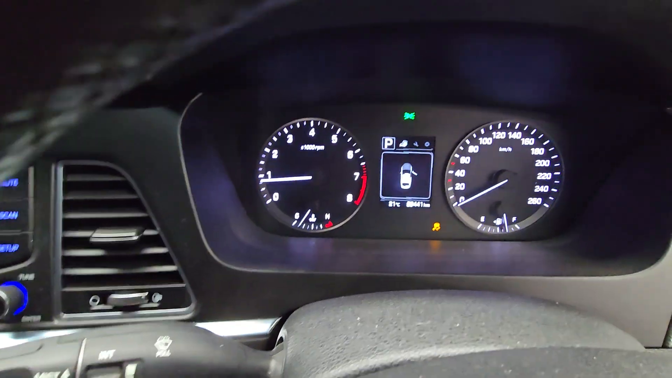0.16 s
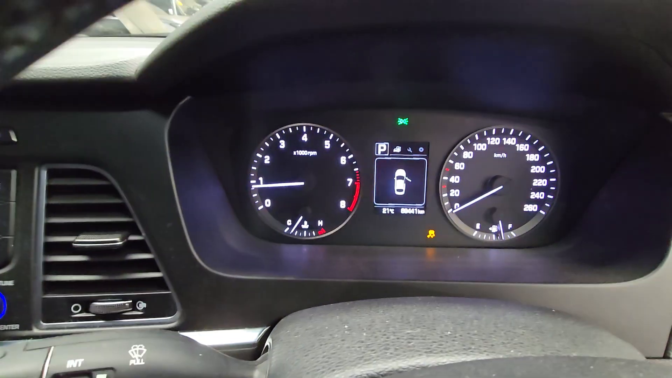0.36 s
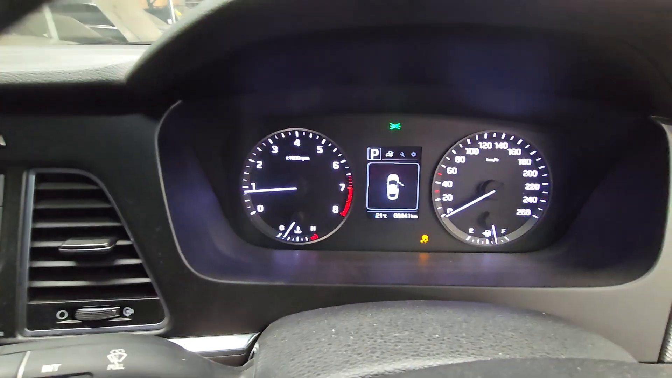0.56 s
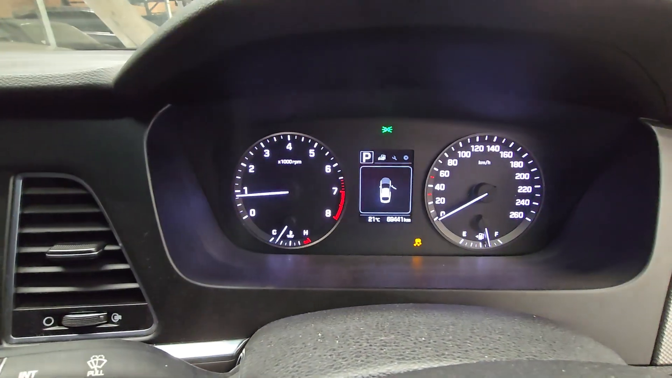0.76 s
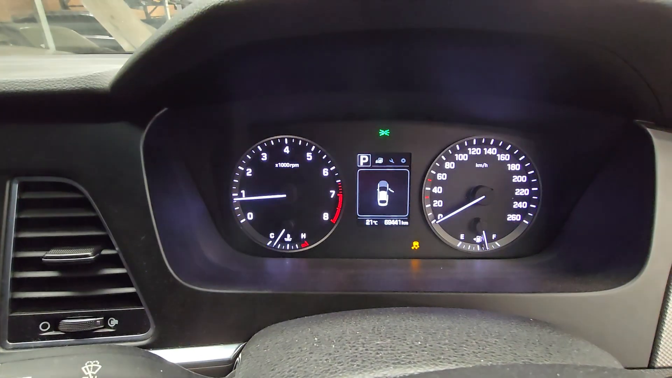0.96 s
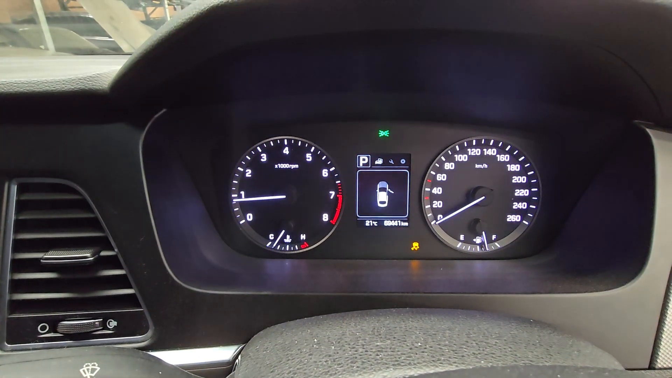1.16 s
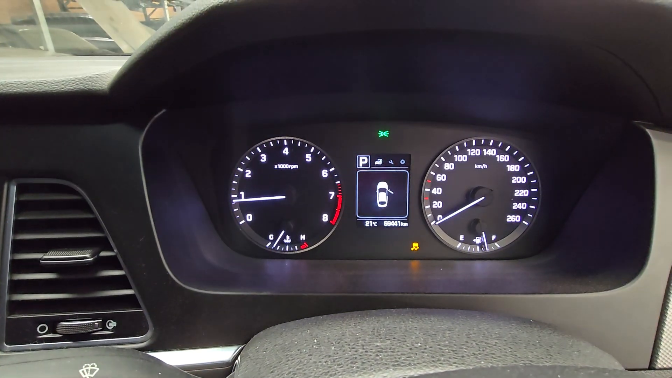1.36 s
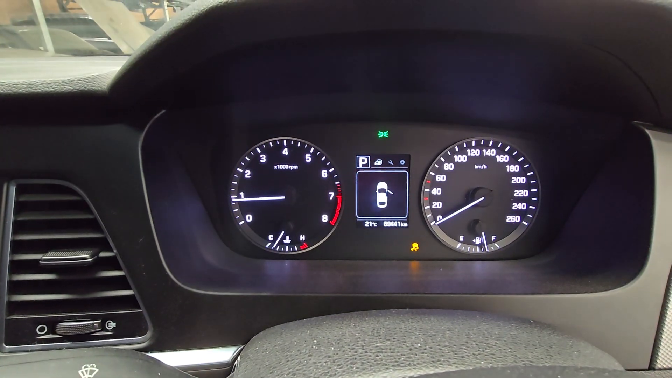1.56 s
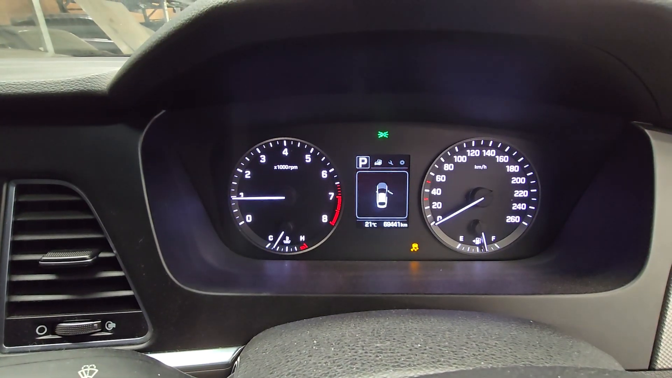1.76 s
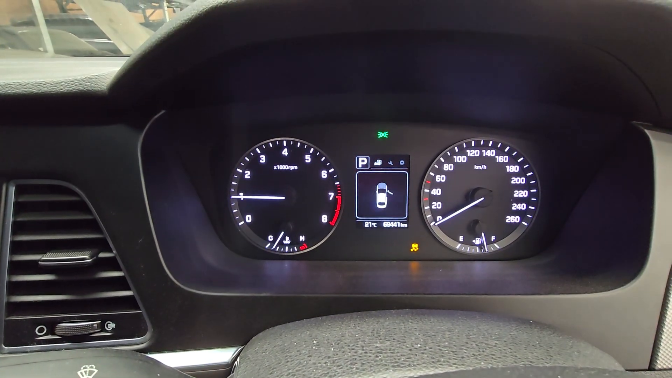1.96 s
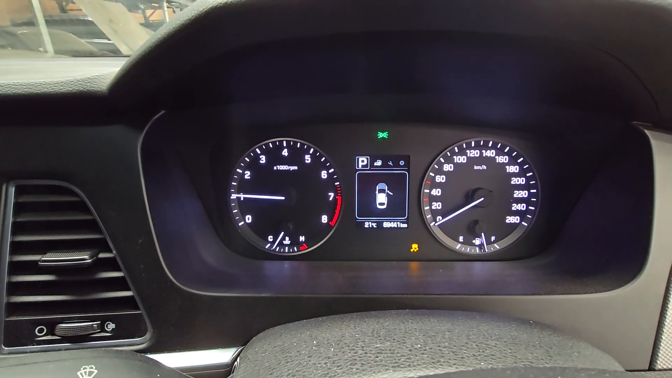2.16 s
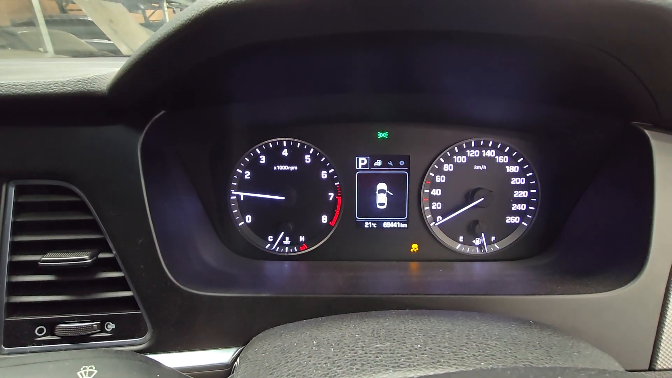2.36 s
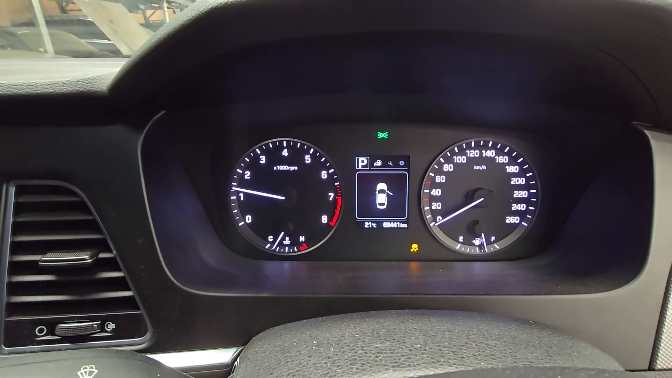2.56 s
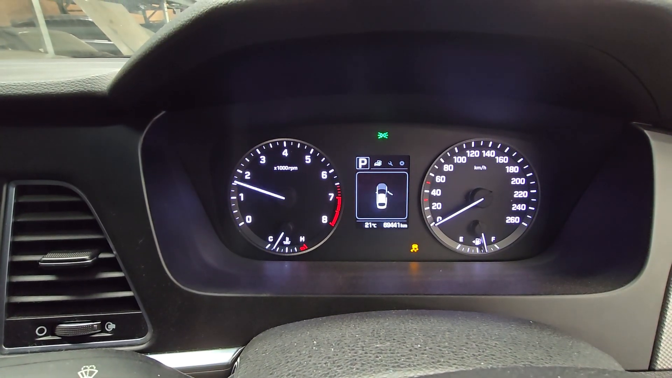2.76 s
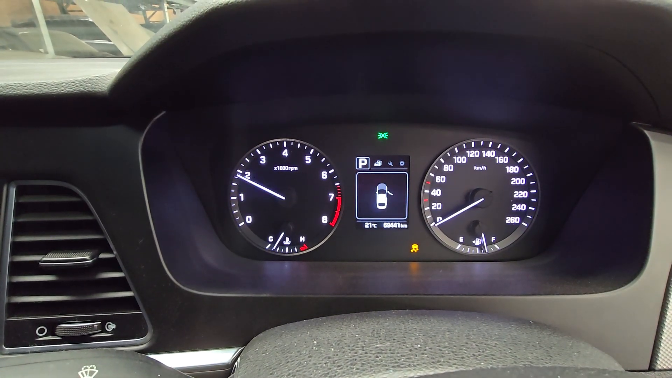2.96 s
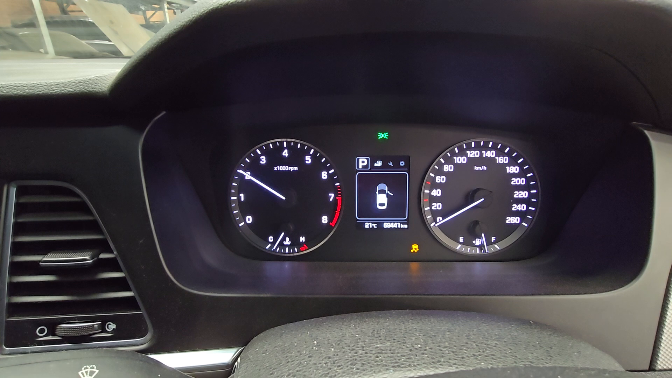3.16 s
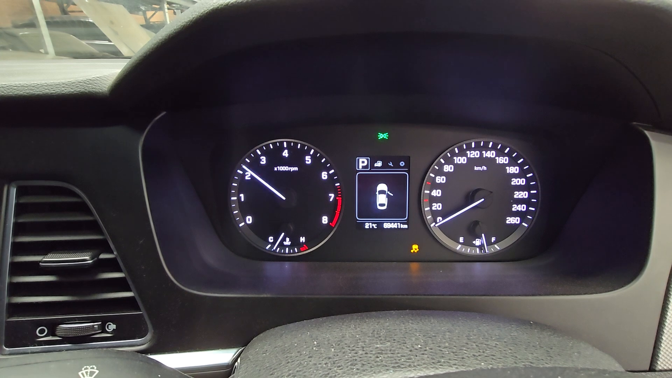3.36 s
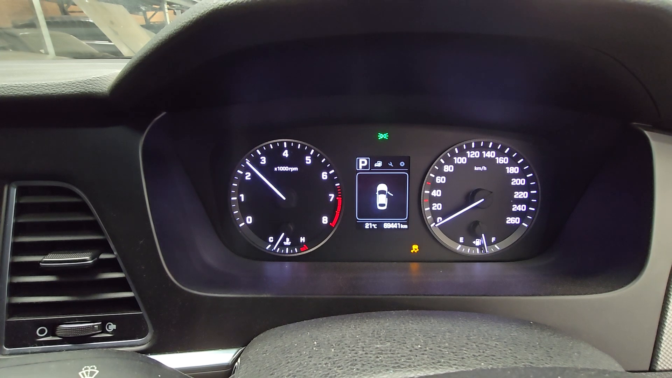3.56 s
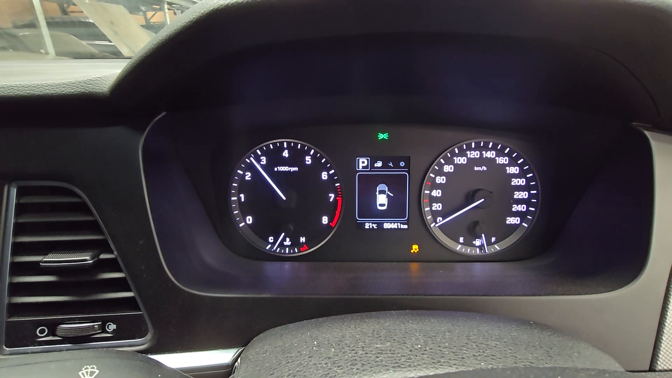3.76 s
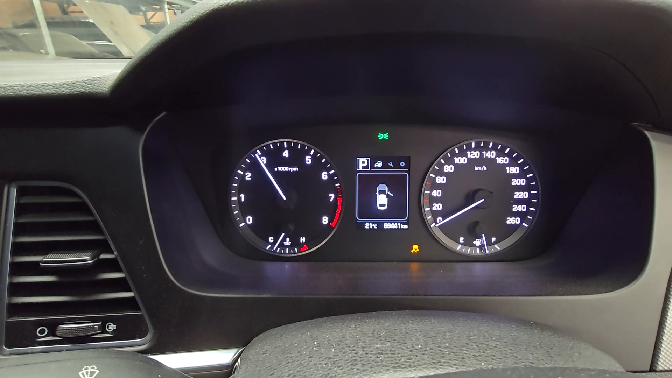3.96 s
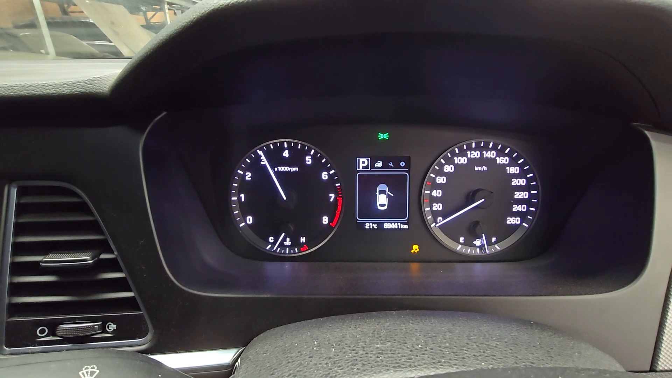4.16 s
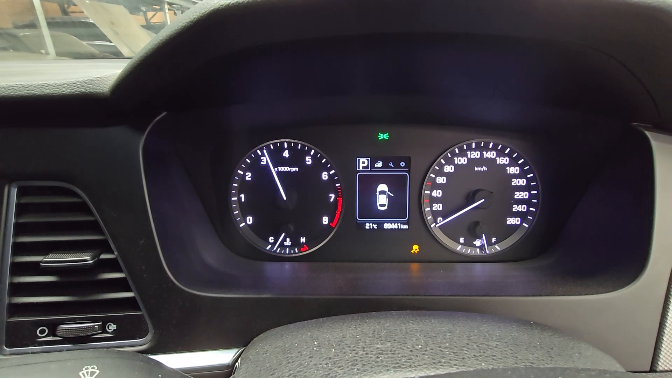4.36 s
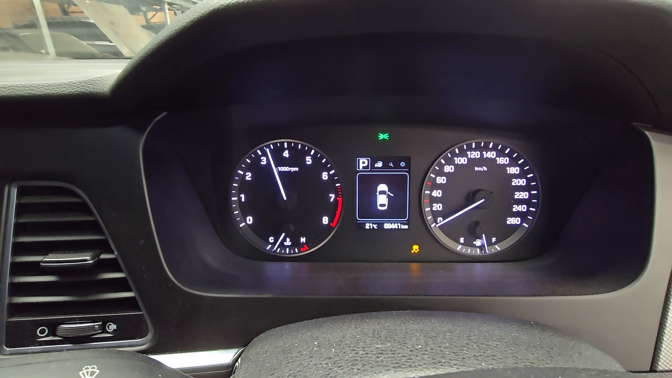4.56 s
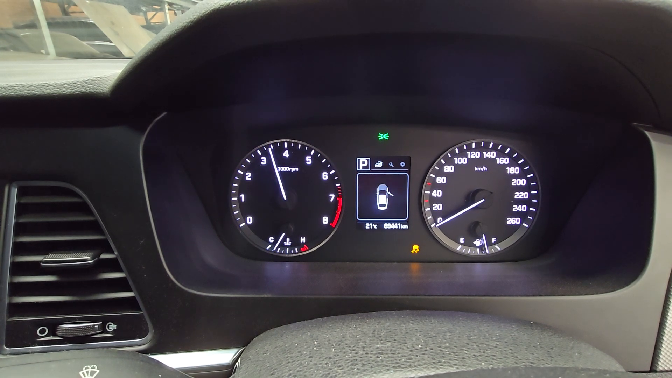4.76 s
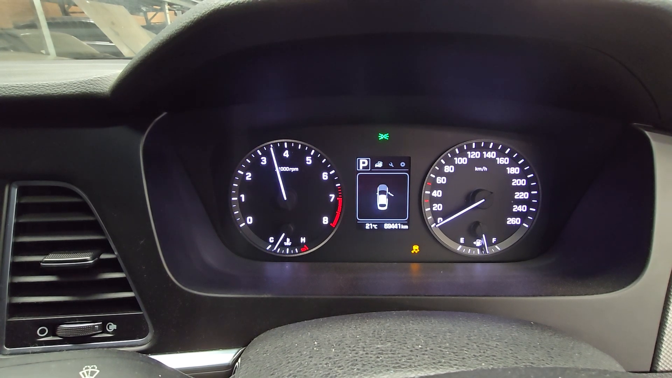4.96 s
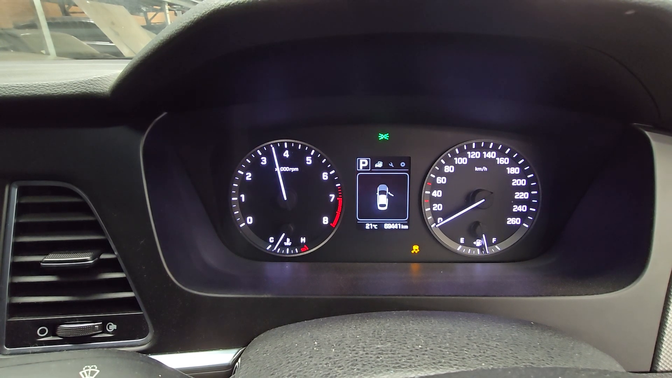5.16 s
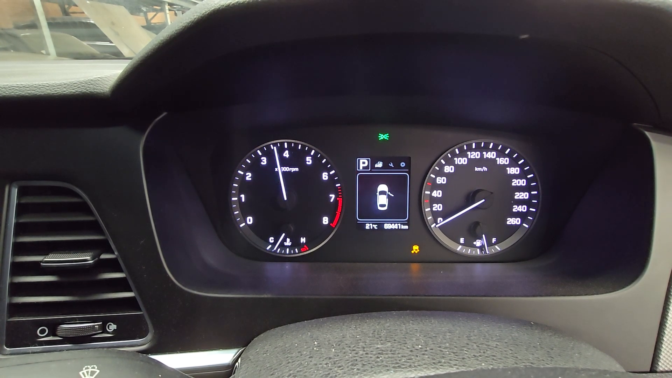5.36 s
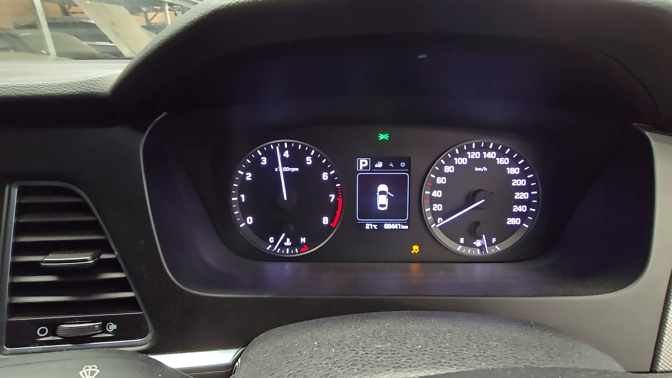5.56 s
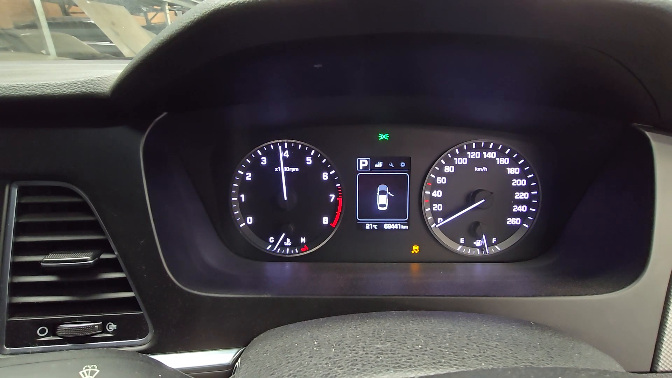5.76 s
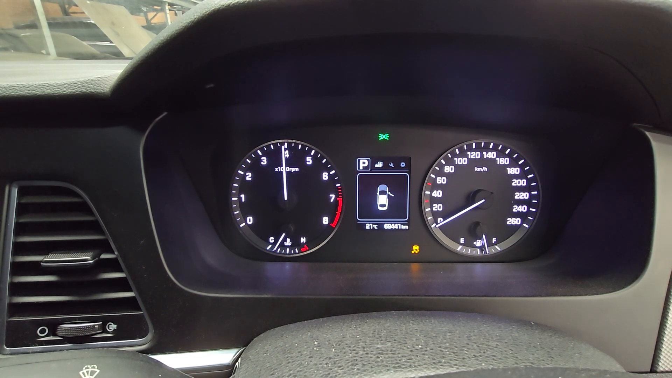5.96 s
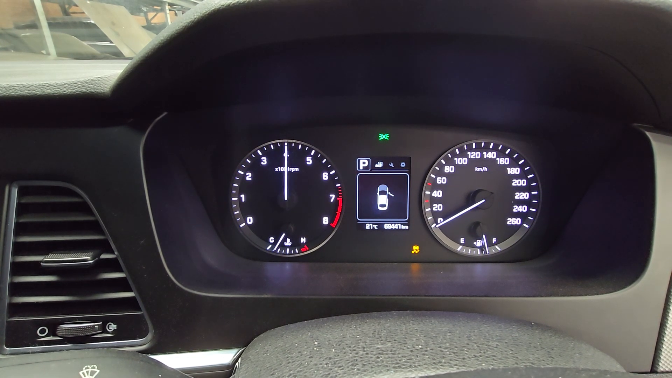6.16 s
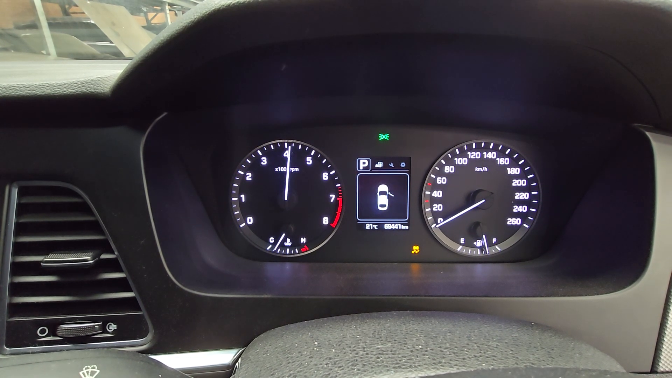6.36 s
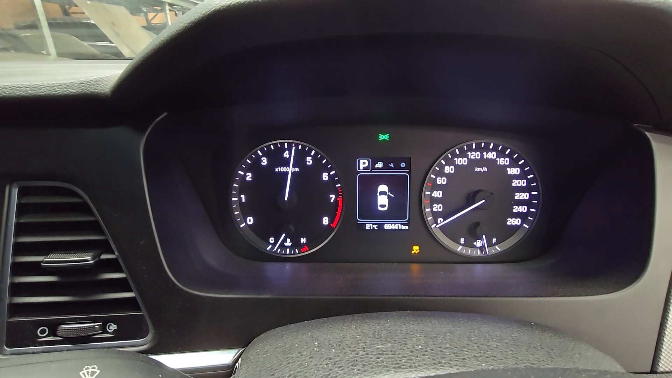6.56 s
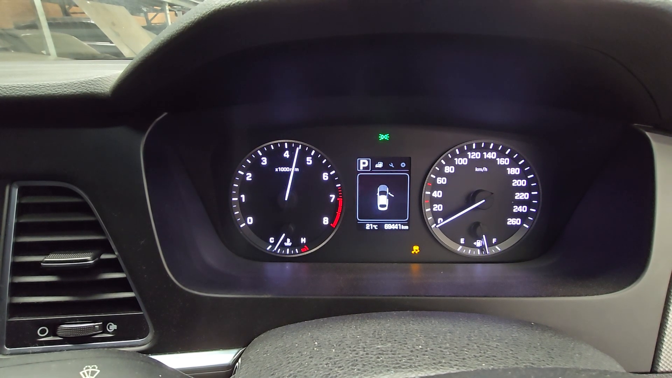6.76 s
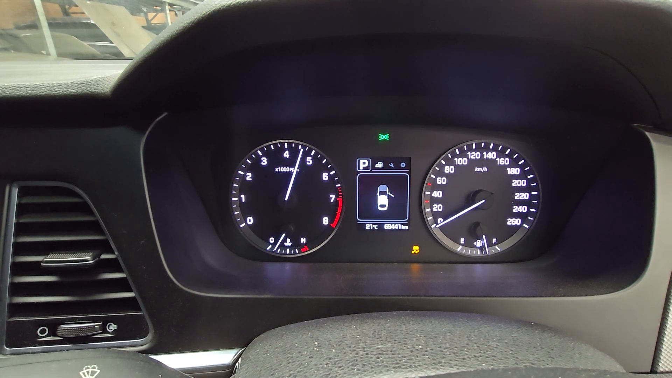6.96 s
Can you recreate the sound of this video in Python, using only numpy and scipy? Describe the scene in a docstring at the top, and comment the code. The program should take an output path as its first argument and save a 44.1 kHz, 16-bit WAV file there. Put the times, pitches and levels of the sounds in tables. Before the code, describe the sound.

Inside a parked car, a four-cylinder petrol engine idles softly with light rustling, then revs in one smooth climb to a loud growling boom.

```python
"""A car idles, heard from the driver's seat, with a light rustle and faint low squeaks, then is revved
to 4800 rpm, with two short high squeaks on the way up.
Four-cylinder petrol engine, parked: one crank phase drives sine orders that boom, growl and whine through
resonances, and noise bursts for knock, valve gear, injectors and buzzing trim. Noise pulsed by the firings gives
rumble and the rush of belts and intake air; rustle is shaped noise, squeaks gliding tones, a faint whistle steady."""
import sys
import numpy as np
from scipy import signal
from scipy.fft import rfft, irfft, next_fast_len
from scipy.io import wavfile
from scipy.ndimage import uniform_filter1d, map_coordinates

SR = 44100
rng = np.random.default_rng(int(sys.argv[2]) if len(sys.argv) > 2 else 0)


def wrap_up_sound(samples):
    """Save the sound to the file named by the first command line argument, as 16-bit audio."""
    columns = np.atleast_2d(samples).T
    # keep every value between -1 and 1, then stretch to whole-number steps
    tamed = np.clip(columns, -1, 1)
    steps = np.round(tamed * 32767).astype(np.int16)
    wavfile.write(sys.argv[1], SR, steps)


N = 309141
TIME = np.arange(N) / SR
FREQS = np.maximum(np.fft.rfftfreq(2 * next_fast_len(N // 2 + 1), 1 / SR), 1)
SIGN = np.array([[1], [-1]])  # left, right

# level difference of the channels: freq_hz, left_minus_right_db
TILT = [(100, 2), (200, 0.5), (320, -3.5), (470, 0.5), (620, -1), (900, 0.5), (1300, -3), (2000, -4),
        (2600, 0.5), (3200, -4.5), (3900, -3.5), (5000, -11), (6200, -1.5), (7800, 16.5), (10000, 10.5),
        (12000, -2.5), (15000, 0)]
# likeness of the channels: freq_hz, correlation (-1 to 1)
LIKENESS = [(170, 0.93), (330, 0.6), (500, 0.09), (800, 0.29), (1150, 0.7), (1700, 0.076), (3000, 0.14),
            (6000, 0.1)]
# phase by which the right channel leads: freq_hz, lead_rad
RIGHT_LEAD = [(55, 0.55), (115, 0.38), (160, .02), (330, .1), (620, 1.45), (1000, 1.83), (1500, 3.25),
              (2100, 4.7), (4000, 10.93)]
# firing note, then its overtones: level_db at REFERENCE_RATE, growth_db per doubling of speed, extra_idle_db
FIRING_ORDERS = [(-27.5, 13.5, -0.5), (-36.0, 6, 8.5), (-44, 8, 8), (-46.5, 7, -1.5), (-49.5, 1.5, -11)]
REFERENCE_RATE = 100  # firings per s


def from_db(db):
    """Decibels to gain."""
    return 10 ** (np.asarray(db) / 20)


def rms_one(x):
    """Scale to unit power."""
    return x / np.sqrt(np.mean(x ** 2) + 1e-20)


def at_hz(points, hz):
    """Read a spectrum on a log-frequency axis."""
    f, value = np.transpose(points)
    return np.interp(np.log(hz), np.log(f), value)


def spectrum_of(x):
    """Transform onto the FREQS grid."""
    return rfft(x, 2 * (len(FREQS) - 1))


def drift(rate_per_s):
    """Smooth random curve through rate_per_s knots a second; spread about 1."""
    knots = rng.standard_normal(4096)
    coarse = map_coordinates(knots, [TIME[::32] * rate_per_s + 2], order=3, mode="wrap")
    return np.interp(TIME, TIME[::32], coarse)


def bell(hz, centre_hz, half_width_hz, db):
    """One resonance, or one dip, in dB."""
    return db / (1 + ((hz - centre_hz) / half_width_hz) ** 2)


def ripple(hz, spacing_hz=14.0):
    """Chance dips that a gliding line meets among the cabin's dense upper modes; nearly level between them."""
    modes = np.minimum(rng.standard_normal(1024), .5) + .2
    return np.interp(hz / spacing_hz, np.arange(len(modes)), modes) * np.minimum(hz / 400, 1)


def body_db(hz):
    """Exhaust and body resonances swell a line that crosses them; standing-wave nodes at the seat fade it."""
    # exhaust and body: centre_hz, half_width_hz, gain_db
    resonances = [(37.47, 0.82, 11.5), (48.6, 6.3, 10.5), (80.7, 5.1, 8), (113, 5, 6), (157.4, 3.4, 3),
                  (242, 4.6, 7), (288.7, 9.4, 7), (357.6, 5.5, 7.5), (546, 12, 7.5), (620.3, 42, 6.5)]
    # cabin nodes: centre_hz, half_width_hz, gain_db
    nodes = [(59, 7.3, -10.5), (85.8, 1.95, -15), (97.3, 0.8, -23), (128.55, 2.5, -15.5),
             (216.6, 4.3, -19.5), (269.6, 6.8, -9), (450, 12, -36)]
    return sum(bell(hz, *row) for row in list(resonances) + list(nodes))


def at_ports(pair, colour, panel_half_width_hz=6.9):
    """Colour two unrelated signals, ring the panels, mix to left and right by likeness; rms 1."""
    # narrow resonances of covers and panels: centre_hz, gain_db
    panels = [(1204, 8.5), (1341, 7.5), (1587, 7.5), (1798, 5.5), (2024, 4.5), (2249, 8), (2641, 6),
              (3261, 2), (3994, 9.5)]
    mid, side = spectrum_of(pair)
    alike = np.clip(at_hz(LIKENESS, FREQS), -1, 1)
    lean = from_db(SIGN * at_hz(TILT, FREQS) / 2)
    lean = lean / np.sqrt(np.mean(lean ** 2, axis=0))
    lean = lean * np.exp(-.5j * SIGN * at_hz(RIGHT_LEAD, FREQS))
    # roll off beyond both ends of the colour table
    low_hz, high_hz = colour[0][0], colour[-1][0]
    skirts = 1 / np.sqrt((1 + (low_hz / FREQS) ** 4) * (1 + (FREQS / high_hz) ** 4))
    panels_db = sum(bell(FREQS, hz, panel_half_width_hz, db) for hz, db in panels)
    both = np.sqrt(1 + alike) * mid + SIGN * np.sqrt(1 - alike) * side
    return rms_one(irfft(both * lean * skirts * from_db(at_hz(colour, FREQS) + panels_db))[:, :N])


def contacts(turns, jitter_s, uneven_db, t60_s, count):
    """Parts that each strike once a turn at their own angle; each rings as its own decaying noise burst."""
    rounds = np.arange(1200)
    age_s = TIME[:2048]  # bursts end here
    out = np.zeros((2, N))
    for part in range(count):
        angle = (part + rng.random()) / count
        late, hard = rng.standard_normal((2, len(rounds)))
        when_s = np.interp(rounds + angle, turns, TIME, left=-1, right=-1) + jitter_s * late
        ring = rng.standard_normal((2, len(age_s))) * from_db(-60 * age_s / t60_s)
        for s, gain in zip(when_s, from_db(uneven_db * hard)):
            if 0 <= s < TIME[-1]:
                i = int(s * SR)
                out[:, i:i + len(age_s)] += gain * ring[:, :N - i]
    return out


def order_tone(turns, multiple, hz, level_db):
    """One sine on a multiple of a rotation; phase and level differ between channels with pitch."""
    side = rng.choice([-1, 1])
    apart_rad = .5 * np.arccos(np.clip(at_hz(LIKENESS, hz), -1, 1)) * side + at_hz(RIGHT_LEAD, hz)
    phase = 2 * np.pi * ((multiple * turns + rng.random()) % 1) - SIGN * apart_rad / 2
    gain = from_db(level_db + SIGN * at_hz(TILT, hz) / 2)
    return np.sqrt(2) * gain * np.sin(phase.astype(np.float32))


def puffing(firings, colour, depth):
    """Noise that swells with every firing."""
    return at_ports(rng.standard_normal((2, N)) * (1 + depth * np.cos(2 * np.pi * firings)), colour)


def whistle():
    """Very faint steady sine."""
    # lines: pitch_hz, level_db
    lines = [(14853, -84)]
    return sum(np.sqrt(2) * from_db(db) * np.sin(2 * np.pi * hz * TIME) for hz, db in lines)


def squeaks(wobble_hz=19.3, flutter_db=5.0):
    """Short, rough, gliding tones with their octaves, the same in both channels."""
    # events: middle_s, spread_s, pitch_hz, glide_hz_per_s, level_db, octave_db re the tone
    events = [(.38, .024, 915, -300, -54, -14), (.485, .045, 905, 100, -51.5, -7),
              (.585, .036, 915, 100, -55.5, -11), (4.552, .04, 4382, 350, -44.5, -25),
              (4.955, .022, 4425, 0, -47.5, -25)]
    out = 0
    for middle_s, spread_s, hz, glide, level_db, octave_db in events:
        pitch_hz = hz + glide * (TIME - middle_s) + wobble_hz * drift(200)
        phase = 2 * np.pi * np.cumsum(pitch_hz) / SR
        swell = np.exp(-.5 * ((TIME - middle_s) / spread_s) ** 2)
        swell = swell * from_db(level_db + flutter_db * drift(65))
        out = out + np.sqrt(2) * swell * (np.sin(phase) + from_db(octave_db) * np.sin(2 * phase))
    return out


def rustle(flicker_db=1.5, rise_db_per_s=130.0, fade_db_per_s=148):
    """Coloured noise whose level swells, holds and dies away for each rustle."""
    # events: start_s, length_s, level_db
    events = [(0.0, 0.044, -49), (.08, .25, -60), (.38, 0.18, -52), (.6, 0.27, -55.5)]
    # colour: freq_hz, density_db per Hz
    colour = [(400, 0), (800, 6), (1100, 0), (1800, -3), (2400, -7), (5000, -8), (7000, -19), (10000, -23),
              (12500, -10.5), (15500, -26)]
    levels_db = []
    for start_s, length_s, db in events:
        before_s = np.maximum(start_s - TIME, 0)
        after_s = np.maximum(TIME - start_s - length_s, 0)
        levels_db.append(db - rise_db_per_s * before_s - fade_db_per_s * after_s)
    gain = from_db(np.max(levels_db, axis=0) + flicker_db * drift(25.3))
    return gain * at_ports(rng.standard_normal((2, N)), colour)


def rush(firings):
    """Air noise of belts and intake, lightly pulsed by the firings."""
    # colour: freq_hz, density_db per Hz
    colour = [(400, -1), (750, -0.5), (1000, -10.5), (1250, 2), (2100, -3.5), (2550, -5), (3250, 0.5),
              (3750, -6.5), (5000, 1.5), (6100, -13.5), (8500, -17.5), (10700, -27), (12000, -14.5),
              (15500, -25)]
    return puffing(firings, colour, depth=.2)


def rumble(firings):
    """Low noise pulsed by the firings."""
    # colour: freq_hz, density_db per Hz
    colour = [(25, -6), (60, -1), (110, -1), (180, 4), (250, 4.5), (315, 8), (370, -11.5), (450, -7.5),
              (600, -9), (1000, -14)]
    return puffing(firings, colour, depth=0.37)


def injectors(firings, rate):
    """Light, loosely timed ticks, four to a firing."""
    # colour: freq_hz, density_db per Hz
    colour = [(500, -8.5), (750, 7), (1030, -23), (1300, -2), (2000, -2.5), (2600, -13), (3300, 1),
              (3800, -6), (4800, 2), (6000, -13), (7000, -14.5), (9000, -44), (12000, -20.5), (15000, -38)]
    hits = contacts(firings, jitter_s=.0006, uneven_db=2.0, t60_s=0.23, count=4)
    return at_ports(hits / np.sqrt(rate), colour)


def clatter(firings, rate):
    """Valves and chain strike once per four-firing cycle: a comb of fine lines that climbs with speed."""
    # colour: freq_hz, density_db per Hz
    colour = [(350, -7), (480, -2), (600, -5), (730, -0.5), (880, -4), (1030, -10.5), (1180, 5), (1450, -4),
              (2100, -3.5), (2500, -11.5), (3200, -5.5), (5000, -10.5), (6200, -19), (10000, -26.5)]
    hits = contacts(firings / 4, jitter_s=.00003, uneven_db=1.5, t60_s=.06, count=16)
    return at_ports(hits / np.sqrt(rate), colour)


def knock(firings, rate):
    """Combustion and piston reversal thump the block: two dull hits a firing, the throb of the idle."""
    # colour: freq_hz, density_db per Hz
    colour = [(170, -2), (250, -2), (330, -1), (385, -8), (450, -22), (720, -12.5), (900, -7.5)]
    hits = contacts(firings, jitter_s=.0002, uneven_db=2.0, t60_s=.07, count=2)
    return at_ports(hits / np.sqrt(rate), colour)


def trim_buzz(firings, rate, onset_rate=123.5, onset_db=-41.5, db_per_doubling=16, flicker_db=1.5):
    """Loose trim rasps, two parts tapping every second firing, above onset_rate (firings per s)."""
    # colour: freq_hz, density_db per Hz
    colour = [(1450, -4), (1680, 8), (1900, -3), (2250, -6), (2500, -25)]
    loose = np.clip(rate - onset_rate, 0, 1)
    taps = contacts(firings / 2, jitter_s=.00005, uneven_db=2.5, t60_s=.025, count=2)
    level_db = onset_db + db_per_doubling * np.log2(rate / onset_rate) + flicker_db * drift(16)
    return loose * from_db(level_db) * at_ports(taps, colour)


def whine(firings, rate, level_db=-59.5, db_per_doubling=13.5, count=24,
          waver_db=4.0, ripple_db=4.5, jitter_cycles=.08):
    """High whole orders sing out, rough and broken, as each crosses a ringing cover."""
    # covers: centre_hz, half_width_hz, gain_db
    covers = [(722, 25, 5), (1203, 19, 8.9), (1360, 36, 7), (1640, 44, 3.6), (2007, 69, 10.3),
              (2815, 38, 4.2)]
    step = 6  # computed at SR / 6
    firings, rate = firings[::step], rate[::step]
    speed_db = level_db + db_per_doubling * np.log2(rate / REFERENCE_RATE)
    out = 0
    for k in range(len(FIRING_ORDERS) + 1, count + 1):
        hz = k * rate
        db = speed_db + sum(bell(hz, *row) for row in covers)
        db = db + ripple_db * ripple(hz) + waver_db * np.minimum(drift(24)[::step], 1)
        out = out + order_tone(firings + jitter_cycles / k * drift(40)[::step], k, hz, db)
    return signal.resample_poly(out, step, 1, axis=1)[:, :N]


def weak_orders(count, cycle_db=-9.0, pulley_multiple=.63, pulley_db=2, uneven_db=0.5, loss_db_per_order=0.24):
    """(Multiple of firing rate, dB): the cycle, a belt pulley, and quarters from unequal cylinders."""
    multiples = np.arange(2, count + 1) / 4
    uneven = [(m, uneven_db - loss_db_per_order * max(m - 2, 0)) for m in multiples if m % 1]
    return [(1 / 4, cycle_db), (pulley_multiple, pulley_db)] + uneven


def growl(firings, rate, growl_db, shake_db, idling, gain_db=-2.5, waver_db=1.5, ripple_db=5.0,
          body_share=0.15, even_idle_db=-6.0):
    """Orders of uneven cylinders glide through the cabin's many narrow modes; firing is more even at idle."""
    # passage into the cabin: freq_hz, gain_db
    cabin = [(30, -4), (70, -11.5), (110, -10), (170, -10), (230, -5.5), (290, -1.5), (390, -8.5),
             (450, -14.5), (560, -21), (730, -26), (880, -16), (1030, -26), (1200, -17), (1400, -19),
             (1600, -22), (2050, -26), (2600, -17)]
    step = 6  # computed at SR / 6
    firings, rate, growl_db, shake_db, idling = (x[::step] for x in (firings, rate, growl_db, shake_db, idling))
    out = 0
    for multiple, order_db in weak_orders(count=68):
        hz = multiple * rate
        db = growl_db + body_share * body_db(hz) if multiple > 2 else shake_db
        db = db + idling * even_idle_db
        db = db + gain_db + order_db + at_hz(cabin, hz) + ripple_db * ripple(hz)
        # no two cycles burn alike; high orders feel it most
        unsteady = min(multiple / 5, 1.5)
        db = db + (waver_db + 2 * unsteady) * np.minimum(drift(18)[::step], 1)
        shaken = firings + 0.097 * unsteady / multiple * drift(30)[::step]
        out = out + order_tone(shaken, multiple, hz, db)
    return signal.resample_poly(out, step, 1, axis=1)[:, :N]


def boom(firings, rate, pull, waver_db=1.2, lumpy_db=0.5, ripple_db=2.5, idle_ends_rate=37.7,
         idle_steadiness=.7, pull_db=0.5, pull_flutter_db=0.8):
    """Firing note and overtones glide through body resonances; lumpy just above the steady idle."""
    # paths through the mounts, which reinforce or cancel: firing_multiple, centre_hz, half_width_hz, gain_db
    mount_paths = [(1, 141, 5.9, 3), (1, 152.3, 1.9, -4), (2, 77.3, 3.9, -16.5), (2, 90, 2.5, 8),
                   (2, 100, 2.4, 6), (2, 105, 4.6, 5), (2, 121.4, 4.1, 10.5), (2, 156, 5.7, -13.5),
                   (2, 312, 6, 2.5), (2, 201.1, 2, -16.5), (3, 117, 8.3, 5.5), (3, 194, 8.5, 11),
                   (3, 317, 7.2, 11), (3, 388, 41, 5.5), (4, 314, 8, 8), (4, 460, 25, -2),
                   (5, 185, 10, 4.5), (5, 532, 39, -16)]
    doublings = np.log2(rate / REFERENCE_RATE)
    at_idle = np.clip((idle_ends_rate - rate) / (idle_ends_rate - rate.min()), 0, 1)
    depth_db = waver_db + lumpy_db * np.clip(1 - rate / REFERENCE_RATE, 0, 1)
    depth_db = depth_db * (1 - idle_steadiness * at_idle)
    out = 0
    for k, (level_db, db_per_doubling, idle_db) in enumerate(FIRING_ORDERS, 1):
        hz = k * rate
        db = level_db + db_per_doubling * doublings + idle_db * at_idle + body_db(hz)
        db = db + depth_db * drift(14)
        db = db + sum(bell(hz, *row) for multiple, *row in mount_paths if round(multiple) == k)
        if k > 1:
            db = db + pull * (pull_db + pull_flutter_db * drift(13)) + ripple_db * ripple(hz)
        out = out + order_tone(firings, k, hz, db)
    return out


def scene(rumble_db=-0.5, idle_rumble_db=3.5, knock_db=-2.0, clatter_db=3.0, idle_clatter_db=-0.5,
          rush_db=1.0, tick_idle_db=-49.5, tick_db_per_doubling=4.5, idling_gone_rate=87.0):
    """The crank drives every engine layer, each with its own level against speed."""
    # crank speed, two firings a turn: time_s, firings_per_s
    speed = [(0.0, 28.2), (1.15, 28.4), (1.55, 33.0), (1.8, 36.3), (2.15, 39.9), (2.42, 46.5), (2.58, 53.5),
             (2.78, 62.1), (3.0, 70.5), (3.2, 76.8), (3.45, 85.3), (3.75, 96.5), (4.05, 106.7),
             (4.3, 111.7), (4.55, 115.5), (4.8, 118.1), (5.16, 121.5), (5.45, 125.9), (5.8, 132.0),
             (6.1, 137.3), (6.45, 146.4), (6.75, 153.8), (7.01, 160.7)]
    rate = np.interp(TIME, *np.transpose(speed))
    firings = np.cumsum(rate * (1 + .001 * drift(10))) / SR
    doublings = np.log2(rate / REFERENCE_RATE)
    # 1 when the speed climbs by 66 firings per s each second
    pull = uniform_filter1d(np.gradient(rate) * SR, size=SR // 5) / 66
    idling = np.clip((idling_gone_rate - rate) / (idling_gone_rate - rate.min()), 0, 1)
    growl_db = -40 + 7.5 * doublings + 0.4 * pull
    noise_db = -39.0 + 13 * doublings
    # above 129 firings per s the engine shakes harder on its mounts
    shake_db = -42 + 6 * doublings + 45 * np.maximum(np.log2(rate / 129), 0)
    tick_db = tick_idle_db + tick_db_per_doubling * np.log2(rate / rate.min())

    out = boom(firings, rate, pull) + growl(firings, rate, growl_db, shake_db, idling)
    out += whine(firings, rate) + trim_buzz(firings, rate)
    out += from_db(growl_db + rumble_db + idle_rumble_db * idling) * rumble(firings)
    out += from_db(growl_db + knock_db) * np.sqrt(idling) * knock(firings, rate)
    out += from_db(noise_db + clatter_db + idle_clatter_db * idling) * clatter(firings, rate)
    out += from_db(noise_db + rush_db + 0.16 * drift(7.6)) * rush(firings)
    out += from_db(tick_db) * injectors(firings, rate)
    return out + rustle() + squeaks() + whistle()


def record(dry, cutoff_hz=15700):
    """Steep elliptic low-pass."""
    return signal.sosfilt(signal.ellip(12, .1, 80, cutoff_hz, fs=SR, output="sos"), dry)


dry = scene()
out = record(dry)
wrap_up_sound(out)
```